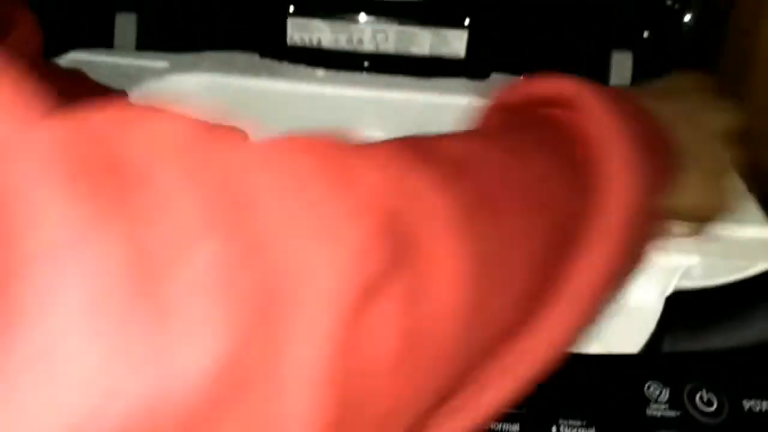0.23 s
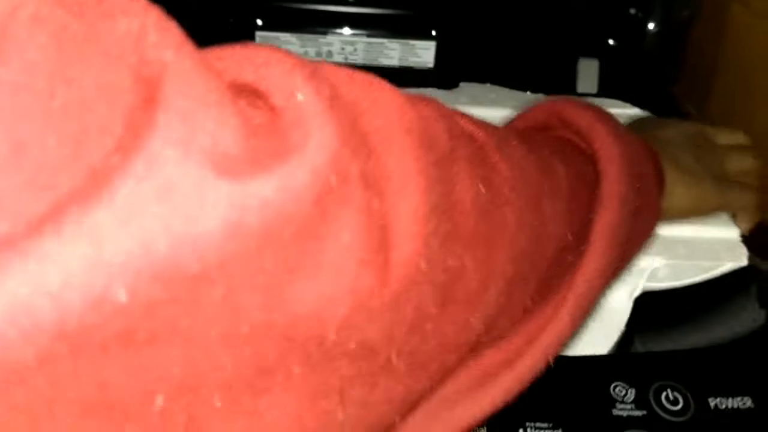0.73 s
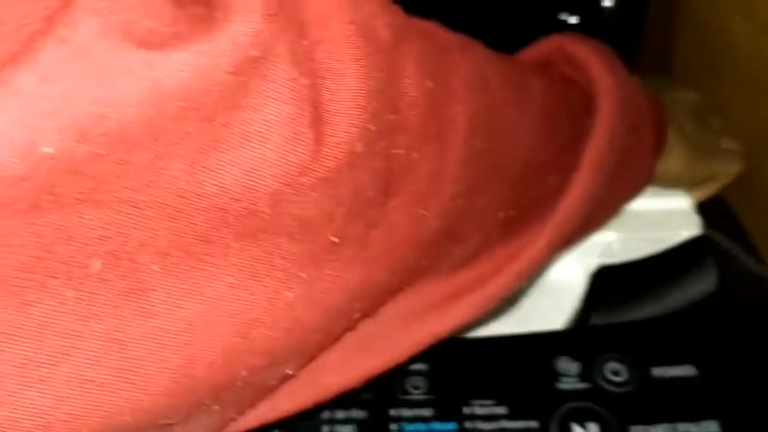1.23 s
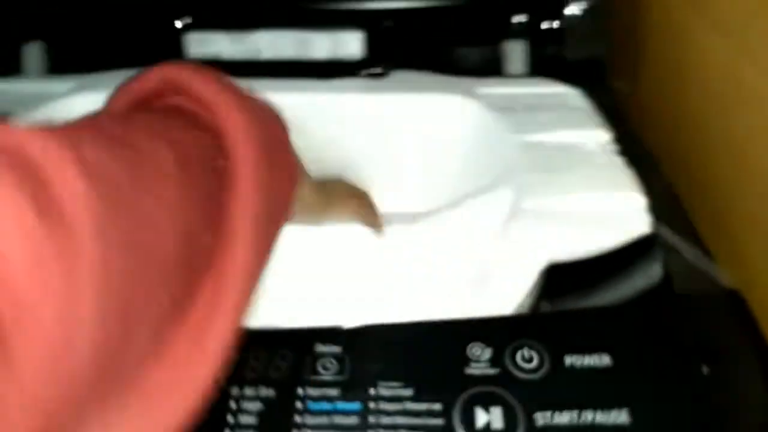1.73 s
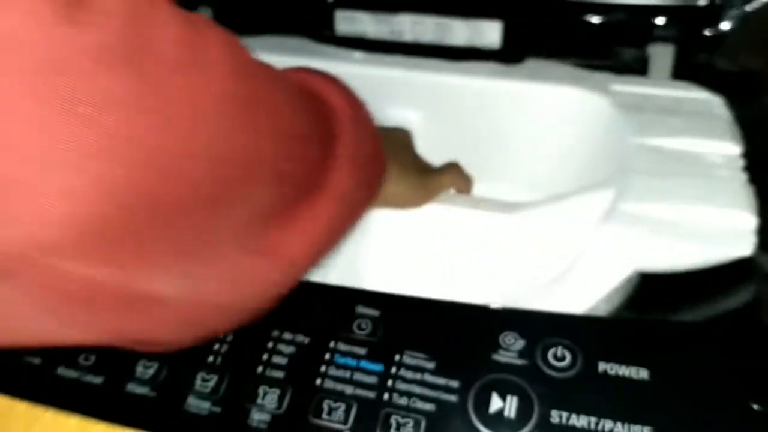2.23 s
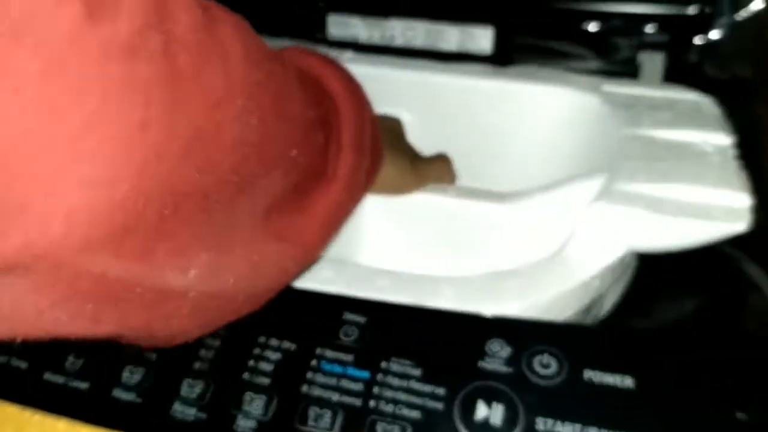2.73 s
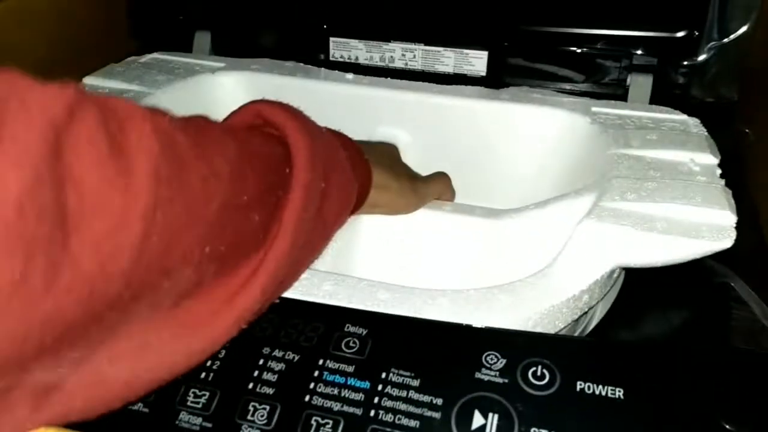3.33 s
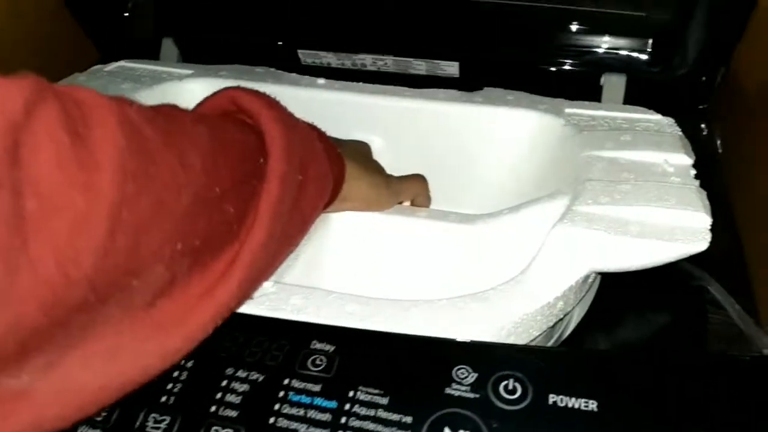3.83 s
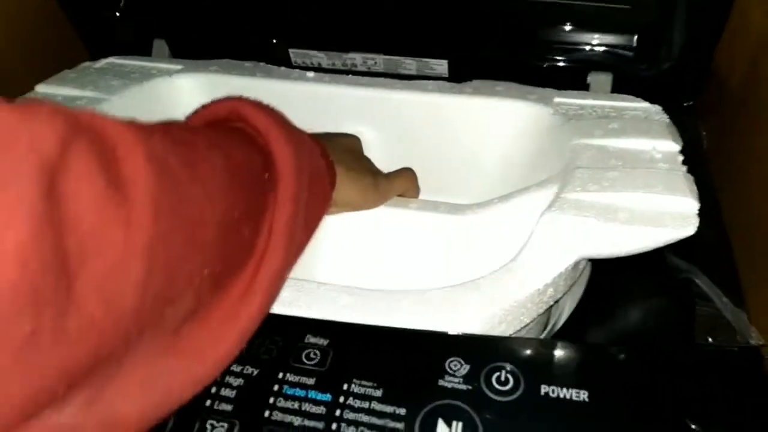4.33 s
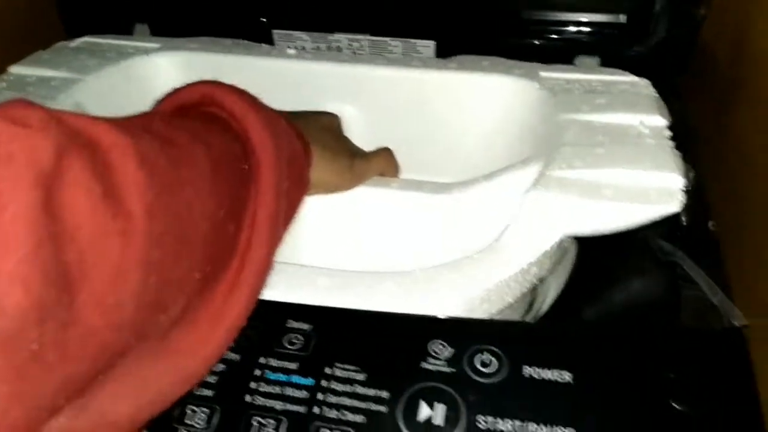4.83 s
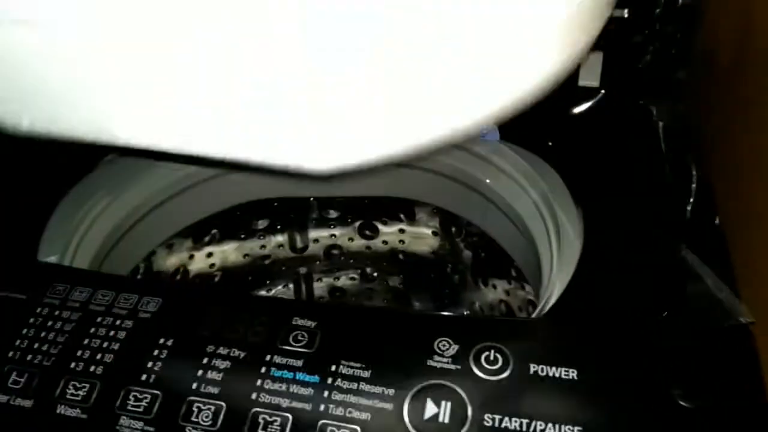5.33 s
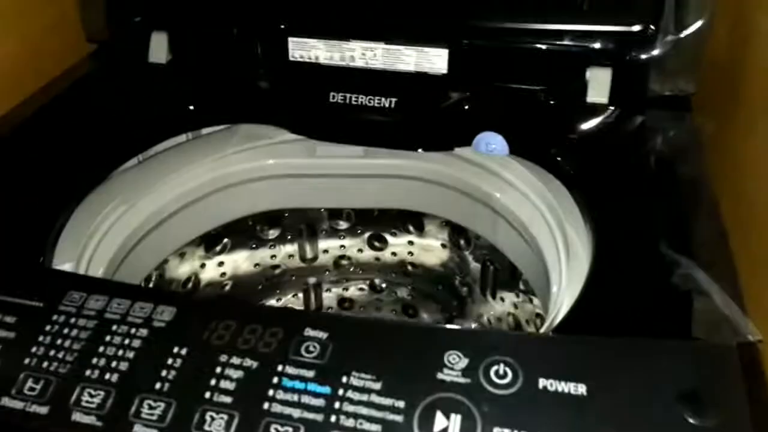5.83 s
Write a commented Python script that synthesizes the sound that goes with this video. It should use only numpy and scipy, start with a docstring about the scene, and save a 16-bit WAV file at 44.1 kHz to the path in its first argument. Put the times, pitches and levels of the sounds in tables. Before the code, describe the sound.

Close, irregular hissing rubs, sharp cracks and brief squeaks of tight foam packing being worked loose from a washing machine's plastic opening.

```python
"""Polystyrene hisses, snaps and thuds close by: a hand works a tight block out of a washing machine.
Foam beads rub over the plastic mouth, edges snap free and tick along the rim, knuckles knock the foam.
The block creaks and a small patch squeaks as they stick and slip; the steel tub booms with each tug.
The open machine adds a short tail, over still air with a faint tone."""
import sys
import numpy as np
from scipy import signal
from scipy.io import wavfile
from scipy.ndimage import uniform_filter1d

SR = 44100
rng = np.random.default_rng(int(sys.argv[2]) if len(sys.argv) > 2 else 0)


def master(y):
    """Save y as 16-bit WAV."""
    cut = np.clip(np.atleast_2d(y).T, -1, 1)
    pcm = np.round(cut * 32767)  # scale
    wavfile.write(sys.argv[1], SR, pcm.astype(np.int16))


N = 267951


def gain_of(db):
    return 10 ** (np.asarray(db) / 20)


def unit_rms(x):
    return x / np.sqrt(np.mean(x ** 2) + 1e-20)


def unit_energy(taps):
    return taps / np.linalg.norm(taps)


def add(mix, start_s, sound):
    part = mix[round(start_s * SR):][:len(sound)]
    part += sound[:len(part)]


def through(x, taps):
    return signal.oaconvolve(x, taps)[:len(x)]


def colour(spectrum):
    """Minimum-phase taps for rows of freq_hz, level_db."""
    freq_hz, level_db = np.transpose(spectrum)
    bin_hz = abs(np.fft.fftfreq(4096, 1 / SR))
    bin_db = np.interp(np.log(bin_hz + 1), np.log(freq_hz), level_db)
    log_gain = np.log(gain_of(np.maximum(bin_db, -100)))
    response = np.exp(np.conj(signal.hilbert(log_gain)))
    return unit_energy(np.fft.ifft(response).real[:2048])


def modes(table):
    """A body's ringing after one click, for rows of pitch_hz, width_hz, level_db."""
    t = np.arange(SR // 2) / SR
    ring = sum(gain_of(db) * width_hz * np.exp(-np.pi * width_hz * t) * np.sin(2 * np.pi * hz * t)
               for hz, width_hz, db in table)
    return unit_energy(ring)


def slides(ramp_db=30):
    """Gains of hiss, grit, pressure and tub push: each slide rises, holds and fades; powers add."""
    # slides of the block: full_at_s, hold_s, rise_s, fade_s, hiss_db, grit_re_hiss_db,
    # pressure_re_hiss_db, push_db
    strokes = [ (0, 0.026, 0.012, 0.087, -37, -11.5, -19, -73),
               (0.071, 0.032, 0.14, 0.072, -27.5, -27.5, -36, -88),
               (0.118, 0.092, 0.063, 0.045, -46.5, -16, -26.5, -73),
               (0.284, 0.018, 0.069, 0.053, -41, -13, -10, -80),
               (0.313, 0.021, 0.046, 0.056, -33, -7.5, -17, -88.5),
               (0.391, 0.051, 0.091, 0.087, -68, -12, -2, -78.5),
               (0.541, 0.0088, .01, 0.071, -69, -21, -15, -75),
               (0.626, 0.051, 0.014, 0.27, -47.5, -29, -35, -69),
               (0.749, 0.1, 0.16, 0.11, -49, -24.5, -23.5, -67),
               (0.895, 0.069, 0.0084, 0.14, -49.5, -35.5, -32, -66.5),
               (0.997, 0.0077, 0.021, 0.038, -32.5, -15.5, -18, -48),
               (1.035, 0.014, 0.0097, 0.11, -30, -10.5, -17, -43),
               (1.294, 0.22, 0.13, 0.054, -51, -33, -27, -71),
               (1.368, 0.028, 0.014, 0.081, -41.5, -7, -9.5, -83),
               (1.483, 0.15, 0.14, 0.13, -44, -25.5, -37, -76.5),
               (1.601, 0.0077, 0.08, 0.022, -26.5, -26.5, -36, -82),
               (1.668, 0.032, 0.064, 0.17, -46.5, -23.5, -32, -70.5),
               (1.826, 0.057, 0.022, 0.15, -30.5, -23, -31.5, -52),
               (1.93, 0.025, 0.072, 0.097, -26.5, -19.5, -29.5, -46.5),
               (2.081, 0.021, 0.06, 0.12, -33, -22, -36, -51.5),
               (2.096, 0.07, 0.0077, 0.21, -37.5, -8, -10.5, -85.5),
               (2.216, 0.024, 0.051, 0.12, -36.5, 2.5, -2, -71),
               (2.273, 0.054, 0.15, 0.15, -24.5, -62, -26, -48.5),
               (2.447, 0.089, 0.068, 0.088, -34, -53, -44, -57),
               (2.52, 0.058, 0.049, 0.12, -47, -1.5, -3.5, -72),
               (2.581, 0.024, 0.037, 0.19, -34, -29, -29, -53.5),
               (2.731, 0.091, 0.087, 0.14, -37.5, -31.5, -36, -68),
               (2.795, 0.085, 0.033, 0.091, -44.5, -6, -1, -47),
               (3.031, 0.025, 0.016, 0.08, -49, -2, 9, -62), (3.113, 0.12, 0.064, .1, -63.5, -24, -5, -76),
               (3.205, 0.021, 0.018, 0.098, -42, -17.5, -19.5, -84),
               (3.28, 0.056, 0.035, 0.15, -68.5, -4, -3, -80),
               (3.364, 0.078, 0.027, .05, -62, -8.5, -20, -72),
               (3.468, 0.0095, 0.0096, 0.051, -50.5, 1, -9, -71),
               (3.507, 0.012, .02, 0.04, -60, -22, 2.5, -71),
               (3.567, 0.02, 0.0098, 0.088, -39, -8.5, -4.5, -49),
               (3.623, 0.043, 0.059, 0.097, -26.5, -18.5, -21.5, -42),
               (3.76, 0.08, 0.02, 0.14, -38, -21.5, -22.5, -56),
               (4.026, 0.041, 0.027, 0.11, -43, -7.5, -5, -89.5),
               (4.123, 0.032, 0.07, 0.11, -22.5, -7.5, -18, -92.5),
               (4.259, 0.067, 0.055, 0.054, -48, -28, -25.5, -72),
               (4.413, 0.032, 0.014, .02, -74.5, -21, 4, -81),
               (4.463, 0.095, 0.014, 0.037, -28, -3, 0.5, -66),
               (4.647, .12, 0.029, 0.057, -27.5, -2, -5, -53.5),
               (4.784, 0.057, 0.048, 0.015, -44.5, -2.5, 5.5, -37.5),
               (4.842, 0.1, 0.018, 0.13, -60, 2.5, 10.5, -34),
               (5.001, 0.025, 0.11, 0.084, -43.5, -10.5, -7.5, -56),
               (5.05, 0.24, 0.021, 0.084, -54.5, -29.5, -40, -60.5),
               (5.214, 0.023, 0.025, 0.085, -33.5, -9.5, -10.5, -34),
               (5.279, 0.016, 0.006, 0.031, -26, -25.5, -23, -54.5),
               (5.33, 0.052, 0.036, 0.21, -50, -18, -24, -54.5),
               (5.372, 0.018, 0.027, 0.12, -51.5, -5, -12, -61),
               (5.487, 0.039, 0.014, 0.044, -56.5, -15, -39, -71),
               (5.55, 0.059, 0.033, 0.11, -60.5, -38.5, -47, -70.5),
               (5.685, 0.011, 0.025, 0.018, -74, -32.5, -27, -68),
               (5.808, 0.033, .01, 0.029, -65, -34.5, -37.5, -86),
               (5.881, 0.073, 0.028, .03, -54.5, -22, -45, -94),
               (5.966, 0.099, .01, 0.045, -57, -10, -10.5, -101), ]
    t, power = np.arange(0, N, 32) / SR, 0
    for at_s, hold_s, rise_s, fade_s, hiss_db, grit_db, press_db, push_db in strokes:
        away = np.maximum((at_s - t) / rise_s, (t - at_s - hold_s) / fade_s).clip(0)
        levels_db = np.array([hiss_db, hiss_db + grit_db, hiss_db + press_db, push_db])
        power = power + gain_of(levels_db[:, None] - ramp_db * away) ** 2
    return [np.interp(np.arange(N) / SR, t, gain) for gain in np.sqrt(power)]


def beads(rate_hz, spread_db, judder_db, judder_s):
    """Beads catch: random clicks of uneven size, in clumps."""
    size = gain_of(spread_db * np.minimum(rng.exponential(1, N), 5))
    catches = rng.random(N) < rate_hz / SR
    span = int(judder_s * SR)
    clumps = unit_rms(uniform_filter1d(uniform_filter1d(rng.standard_normal(N), span), span))
    return unit_rms(size * catches * rng.standard_normal(N) * gain_of(judder_db * clumps))


def foam_hiss(x, hiss_gain, split_hz=11500, thin_below_db=-44):
    """Bright colour of foam on plastic; quiet hiss is thinner, mostly top treble."""
    # hiss spectrum, with the microphone's bright peak: freq_hz, level_db
    spectrum = [(1760, -52), (3000, -25.5), (4230, -18), (6480, -16), (10500, -8), (11400, -3), (13200, 0),
                (14900, -1), (16000, -27)]
    hiss = through(x, colour(spectrum))
    low = signal.sosfiltfilt(signal.butter(4, split_hz, fs=SR, output="sos"), hiss)
    fullness = np.minimum(hiss_gain / gain_of(thin_below_db), 1)
    return hiss - low + low * fullness ** 0.15


def cell_walls(x, share):
    """Part of the treble rings in the thin foam walls."""
    # wall modes: pitch_hz, width_hz, level_db
    wall_modes = [(9690, 51, 1), (10200, 110, 0.5), (10760, 170, 5.5), (11676, 110, -1.5),
                  (12640, 150, 0.5), (13900, 160, -12.5), (14600, 35, 4)]
    return np.sqrt(1 - share) * x + np.sqrt(share) * through(x, modes(wall_modes))


def rim(x, ribs_share=0.067):
    """Broad grit with the ribs ringing in it."""
    # grit spectrum: freq_hz, density_db
    grit_spectrum = [(530, -29), (900, 3), (1470, 2.5), (1850, 2), (3090, 1.5), (6060, -6), (9000, -18.5),
                     (11700, -26), (19800, -120)]
    # rib and rim modes: pitch_hz, width_hz, level_db
    rib_modes = [(1570, 240, 5.5), (2312, 320, 8), (3110, 260, 9), (3810, 140, 5.5), (4557, 200, 0),
                 (5260, 180, 2.5)]
    grit = through(x, colour(grit_spectrum))
    return np.sqrt(1 - ribs_share) * grit + np.sqrt(ribs_share) * through(x, modes(rib_modes))


def moving_contact(x, patchy_db=3.5):
    """The contact moves, so the colour shifts in patches of time and frequency."""
    spectra = signal.stft(x, nperseg=256, noverlap=192)[2]
    patches = rng.standard_normal(spectra.shape[::-1]).T
    patches = unit_rms(uniform_filter1d(uniform_filter1d(patches, 4, axis=0), 24, axis=1))
    return signal.istft(spectra * gain_of(patchy_db * patches - 3), nperseg=256, noverlap=192)[1][:len(x)]


def block(pressure, loose_s=3.95):
    """The block's low modes change once it is loose; slow pushes make no sound."""
    # block seated in the mouth: pitch_hz, width_hz, level_db
    seated_modes = [(193, 7.7, -19), (332.6, 49, 11.5), (415, 78, 6), (772, 250, 11), (1370, 78, 2.5)]
    # block loose: pitch_hz, width_hz, level_db
    loose_modes = [(195, 30, -22), (336, 17, 9), (492, 60, -2), (780, 120, 10), (918, 94, 3.5)]
    loose = np.arange(N) > loose_s * SR
    ring = through(pressure * ~loose, modes(seated_modes)) + through(pressure * loose, modes(loose_modes))
    return signal.sosfilt(signal.butter(2, 140, "highpass", fs=SR, output="sos"), ring)


def foam(hiss_gain, grit_gain, pressure_gain):
    """Rubbing, snaps and creaks drive hiss, rim and block."""
    slips, gate, regular = creaks()
    hiss = hiss_gain * gate * beads(13000, 0.35, 2.35, 0.0041)
    # regular slips displace random tearing and pressure
    grit = grit_gain * gate * gain_of(-17 * regular) * beads(6000, 1.1, 1.9, 0.012)
    pressure = pressure_gain * gain_of(-9.1 * regular) * beads(2500, 0.8, 2.0, 0.0072)
    cracks, snap_grit, blows = snaps()
    tear = gain_of(-60 * np.arange(SR // 8) / SR / 0.008)  # each slip tears beads for a few ms
    torn = through(abs(slips), unit_energy(tear)) * rng.standard_normal(N)
    rubbing = moving_contact(cell_walls(foam_hiss(hiss, hiss_gain), share=0.039) + rim(grit))
    crackling = foam_hiss(cracks + gain_of(-7) * torn, hiss_gain) + rim(snap_grit)
    creaking = gain_of(-15) * rim(torn) + gain_of(-7) * rim(slips, ribs_share=0.85)
    return rubbing + crackling + creaking + block(pressure + slips + blows)


def cavity(x, t60_s=0.06, delay_s=0.003):
    """Short tail of the open machine: sparse echoes of random sign."""
    grid = np.arange(0, SR // 3, 20)
    echoes = rng.choice([-1., 1.], len(grid)) * gain_of(-60 * grid / SR / t60_s)
    taps = np.zeros(SR // 2)
    taps[grid + rng.integers(0, 20, len(grid)) + int(delay_s * SR)] = echoes
    return through(x, unit_energy(taps))


def tub(push_gain):
    """Lumpy shoves and single bumps ring the steel tub and cabinet."""
    # tub modes: pitch_hz, width_hz, level_db
    tub_modes = [(68.5, 13, 0), (93, 20, -7), (125, 30, -11), (180, 60, -15)]
    # block bumps the tub: start_s, level_db
    bumps = [(0.969, -46), (1.412, -56.5), (2.323, -38), (2.828, -45), (3.034, -48), (3.598, -35.5),
             (3.825, -46), (4.79, -48), (5.218, -29.5), (5.28, -35.5)]
    push = push_gain * beads(1100, 0.66, 1.5, 0.05)
    for start_s, level_db in bumps:
        add(push, start_s, gain_of(level_db) * np.hanning(60))
    return through(push, modes(tub_modes))


def air(level_db=-83, tone_hz=1019, tone_width_hz=8):
    """Still air and a faint wavering tone."""
    # air spectrum: freq_hz, density_db
    spectrum = [(24, -27.5), (40, -4.5), (81, -3), (516, -11.5), (1040, -16), (4460, -28.5), (11300, -16),
                (16000, -25)]
    # tone envelope: time_s, level_db
    tone_levels = [(0, -62.5), (0.45, -85), (.75, -80.5), (1.501, -100), (2.8, -71), (3.1, -110)]
    time_s, tone_db = np.transpose(tone_levels)
    tone = through(rng.standard_normal(N), modes([(tone_hz, tone_width_hz, 0)]))
    still = gain_of(level_db) * through(rng.standard_normal(N), colour(spectrum))
    return still + gain_of(np.interp(np.arange(N) / SR, time_s, tone_db)) * tone


def snaps(tick_t60_s=0.0048, pop_t60_s=0.0035):
    """Edges snap free: a tick, then a tail. Returns cracks, grit for the rim, blows on the block."""
    # edge snaps: start_s, crack_db, grit_re_crack_db, blow_re_crack_db
    edges = [(0.2529, -36, 4.5, -10.5), (0.415, -32, -33, -59), (.527, -32.5, -41, -40),
             (0.685, -25.5, -39, -26), (0.708, -28, -37, -8.5), (0.8145, -16.5, -51, -43),
             (0.964, -36.5, -6, 2), (0.9948, -6, -24, -31), (1.0359, -15.5, -7.5, -8),
             (1.3668, -15, -6.5, -13), (1.599, -11.5, -36.5, -50), (1.822, -25, -32, -8),
             (1.9223, -26, -2.5, 1), (2.038, -24.5, -50, -44), (2.0982, -14, -5, -43),
             (2.509, -15.5, -15, -29), (2.514, -18.5, -8.5, -41), (2.523, -24, -3.5, -30),
             (2.5294, -21, -13, -21), (2.5446, -14, -9.5, -34), (2.557, -21.5, -3, -36),
             (2.581, -15.5, -35, -10), (2.691, -31, -28, -40), (2.797, -37.5, -5, 16),
             (2.83, -19, -25, -34), (2.837, -14.5, -7.5, -33), (2.845, -16, -3, -20),
             (2.957, -41, -33, -38), (3.035, -25.5, -31, 12.5), (3.257, -27.5, -42, -44),
             (3.303, -36, -35, -40), (3.3648, -36.5, -0.5, -28), (3.436, -52, -17, 18.5),
             (3.466, -25.5, -5.5, -40), (3.564, -21, -10, -27), (3.591, -15.5, -35, -34),
             (3.7906, -16, -21.5, -47), (3.815, -23, -37, -27), (3.914, -26, -10.5, -12.5),
             (3.977, -39, -30, -46), (4.0062, -14, -22, -36), (4.0274, -4.5, -11.5, -45),
             (4.0523, -12.5, -6, -42), (4.0707, -9.5, -9.5, -34), (4.193, -18.5, -9.5, -28),
             (4.207, -14.5, -9, 3), (4.223, -14.5, -27, -39), (4.239, -14, -10, -31),
             (4.269, -21, -13.5, -8.5), (4.435, -35.5, -9, 5), (4.445, -32.5, -9.5, 13),
             (4.622, -17.5, -10.5, 5), (4.636, -20, -14.5, 10), (4.7923, -28, -6, 18),
             (4.808, -29, 0, 18.5), (4.8243, -17, -7, 11), (4.835, -19.5, -3.5, -2),
             (4.8679, -20, -4.5, 13), (4.8947, -19, -3.5, 16), (4.9222, -16.5, -3.5, 8),
             (4.9413, -15, -5, 8), (5.1925, -13, -36, -34), (5.2, -9, -22, -45), (5.279, -19.5, -15, 1.5),
             (5.712, -55, -10.5, -10.5), (5.9716, -31, -2, -1), (6.0493, -31, -3.5, -1)]
    # dry pops as the block tears loose: start_s, level_db
    pops = [(4.0538, -4), (5.1928, 1), (5.1998, 3)]
    t = np.arange(SR // 8) / SR
    jolt = 0.22 * np.exp(-t / 0.0001)  # the block jumps as the edge lets go
    bursts = rng.standard_normal((128, len(t))) * (1 - np.exp(-t / 0.0005))
    cracks, grit, blows = np.zeros((3, N))
    for (start_s, crack_db, grit_db, blow_db), burst in zip(edges + rattles(), bursts):
        shake = min(gain_of(max(blow_db, grit_db)), 1)  # more shake: softer tick, longer tail
        tail_t60_s = 0.023 + 0.0094 * shake
        tick = gain_of(crack_db - 8 - 14.4 * np.sqrt(shake) - 60 * t / tick_t60_s) * burst
        tail = gain_of(crack_db - 10 - 60 * t / tail_t60_s) * burst
        add(cracks, start_s, tick + tail)
        add(grit, start_s, gain_of(grit_db) * (tick + tail))
        add(blows, start_s, gain_of(crack_db + blow_db) * jolt + gain_of(blow_db - 9) * tail)
    for (start_s, level_db), burst in zip(pops, bursts[::-1]):
        add(cracks, start_s, gain_of(level_db - 60 * t / pop_t60_s) * burst)
    return cracks, grit, blows


def knocks(attack_s=0.0059):
    """Knuckles thud on hollow foam: close modes, the higher ones dying sooner."""
    # knuckle hits: start_s, level_db, t60_at_450_hz_s
    hits = [(0.2552, -6.5, 0.044), (0.287, -23.5, 0.071), (0.316, -20.5, 0.041), (0.335, -35, 0.1),
            (1.365, -41.5, 0.14), (3.062, -44, 0.15)]
    # modes of the hollow: pitch_hz, level_db
    hollow_modes = [(300, -28), (365, -21), (420, 0.5), (490, 0.5), (570, -2), (680, -10.5), (880, -13.5),
                    (1150, -19)]
    t, out = np.arange(SR // 4) / SR, np.zeros(N)
    for start_s, level_db, t60_s in hits:
        ring = sum(gain_of(db - 60 * t / t60_s * (hz / 450) ** 0.43) * np.sin(2 * np.pi * hz * t)
                   for hz, db in hollow_modes)
        add(out, start_s, gain_of(level_db) * ring * (1 - np.exp(-t / attack_s)))
    return out


def rattles(fade_db=-10.5, grit_db=-56, blow_db=-27):
    """An edge ticks along the rim as a slide dies, slower and fainter. Returns rows of small snaps."""
    # runs of ticks: start_s, length_s, first_rate_hz, first_level_db
    runs = [(0.398, 0.06, 125, -34), (2.87, 0.057, 114, -30), (3.0227, 0.13, 90, -28.5),
            (4.32, 0.055, 130, -59), (4.996, 0.032, 95, -36), (5.894, 0.093, 81, -52),
            (5.489, 0.035, 140, -41)]
    rows = []
    for start_s, length_s, rate_hz, level_db in runs:
        progress = np.arange(0, 1, 1 / (length_s * SR))
        cycles = np.cumsum(rate_hz * (1 - progress ** 4)) / SR
        for k in np.flatnonzero(np.diff(np.ceil(cycles), prepend=0)):
            rows.append((start_s + k / SR, level_db + fade_db * progress[k], grit_db, blow_db))
    return rows


def scrapes():
    """Short scrapes: narrow midrange rings or broad bursts of bright hiss; quick start, slower end."""
    # scrapes: start_s, length_s, centre_hz, width_hz, level_db
    contacts = [(0.486, 0.066, 1450, 50, -81), (1.034, 0.046, 1340, 180, -41.5),
                (3.201, 0.062, 13700, 4000, -42), (3.36, 0.033, 2200, 800, -53.5),
                (5.278, 0.034, 13000, 4500, -23.5)]
    out = np.zeros(N)
    for start_s, length_s, centre_hz, width_hz, level_db in contacts:
        progress = np.minimum(np.arange(SR // 5) / SR / length_s, 1)
        envelope = np.minimum(10 * progress, 1) * np.cos(np.pi / 2 * progress)
        friction = rng.standard_normal(len(progress)) * envelope
        band = modes([(centre_hz, width_hz, 0)])
        steep_band = unit_energy(through(band, band))
        add(out, start_s, gain_of(level_db) * through(friction, steep_band))
    return out


def creaks():
    """The whole block sticks and slips. Returns a click per slip, a hiss gate, a 0-1 creaking mask."""
    # one path per creak: time_s, slip_rate_hz, level_db, unevenness (0-1)
    paths = [
        [(2.199, 168, -56, 0.01), (2.225, 247, -42, 0.17), (2.265, 390, -42.5, 0.05)],
        [(4.105, 990, -33, 0.01), (4.11, 840, -31.5, 0.11), (4.122, 513, -30, 0.07), (4.148, 365, -32, 0.04),
         (4.163, 210, -30.5, 0.1), (4.18, 117, -39.5, 0.01), (4.199, 107, -36, 0.1)],
        [(4.457, 187, -33, 0.13), (4.5, 194, -31.5, 0.13), (4.575, 175, -33.5, 0.1)],
        [(4.644, 406, -31.5, 0.09), (4.678, 425, -27.5, 0.14), (4.7, 460, -31, 0.19), (4.728, 476, -29.5, 0.01),
         (4.762, 513, -29.5, 0.08), (4.778, 420, -32, 0.08)],
    ]
    slips, gate, regular = np.zeros(N), np.ones(N), np.zeros(N)
    for path in paths:
        time_s, *columns = np.transpose(path)
        t = np.arange(time_s[0], time_s[-1], 1 / SR)
        rate_hz, level_db, uneven = (np.interp(t, time_s, column) for column in columns)
        rate_noise, size_noise = rng.standard_normal((2, SR // 4))[:, :len(t)]
        wander = unit_rms(uniform_filter1d(rate_noise, 120))
        cycles = np.cumsum(rate_hz * (1 + 0.5 * uneven * wander)) / SR
        clicks = np.diff(np.floor(cycles), prepend=0) > 0
        size = (1 + 1.6 * uneven * size_noise) * signal.windows.tukey(len(t), 0.1)
        puffs = unit_rms(np.exp(-(cycles % 1) / 0.55)) - 1  # beads hiss hardest during a slip
        add(slips, t[0], clicks * size * gain_of(level_db) * np.sqrt(SR / rate_hz))
        add(gate, t[0], 0.88 * puffs)
        add(regular, t[0], signal.windows.tukey(len(t), 0.2))
    return slips, gate, regular


def squeaks():
    """A small patch slips fast: wavering, fluttering tones with overtones."""
    # one path per squeak: time_s, pitch_hz, level_db
    paths = [
        [(2.256, 3870, -42), (2.268, 5020, -41), (2.278, 5500, -48), (2.285, 6460, -40), (2.3, 6700, -55)],
        [(2.288, 7660, -55), (2.297, 9600, -46.5), (2.305, 10100, -56), (2.318, 8900, -45.5),
         (2.325, 7900, -38), (2.332, 7650, -56)],
        [(2.326, 7350, -50), (2.34, 5900, -42), (2.35, 6900, -42), (2.356, 8820, -35), (2.36, 9530, -37),
         (2.374, 9640, -40), (2.38, 10680, -41.5), (2.388, 10690, -47), (2.395, 9680, -38),
         (2.415, 8740, -36.5), (2.432, 7770, -46), (2.47, 7070, -57)],
        [(2.575, 3710, -60), (2.6, 3970, -34), (2.635, 3935, -35), (2.655, 4330, -52)],
    ]
    # partials per squeak: first_db, second_db, third_db
    timbres = [
        [0, 3, -5],
        [5, -18, -40],
        [1, 7, -26],
        [-20, -9, 4],
    ]
    # pitch waver per squeak: rms_fraction
    waver_depths = [.02, .02, .016, .005]
    out = np.zeros(N)
    for path, partials_db, depth in zip(paths, timbres, waver_depths):
        time_s, path_hz, path_db = np.transpose(path)
        t = np.arange(time_s[0], time_s[-1], 1 / SR)
        waver = unit_rms(uniform_filter1d(rng.standard_normal(len(t)), 50))
        flutter = unit_rms(uniform_filter1d(rng.standard_normal(len(t)), 160))
        pitch_hz = np.interp(t, time_s, path_hz) * (1 + depth * waver)
        phase = 2 * np.pi * np.cumsum(pitch_hz) / SR
        tone = sum(gain_of(db) * np.sin(k * phase) * (k * pitch_hz < SR / 2)
                   for k, db in enumerate(partials_db, 1))
        level_db = np.interp(t, time_s, path_db) + 6.5 * (np.minimum(flutter, 1) - 0.5)
        add(out, t[0], np.sqrt(2) * tone * gain_of(level_db) * signal.windows.tukey(len(t), 0.2))
    return cell_walls(out, share=0.6)


def scene():
    """Foam in the machine's mouth, its short tail, the tub and still air; mono."""
    hiss_gain, grit_gain, pressure_gain, push_gain = slides()
    near = foam(hiss_gain, grit_gain, pressure_gain) + squeaks() + scrapes() + knocks()
    return (near + gain_of(-10) * cavity(near) + tub(push_gain) + air())[None]


def record(dry):
    """The deepest bass is cut, the top treble steps down, then the band ends."""
    bass_hz, shelf_hz, shelf_db, edge_hz = 60, 15650, -18, 16800
    dry = signal.sosfilt(signal.butter(4, bass_hz, "highpass", fs=SR, output="sos"), dry)
    rounded = 0.6 * np.tanh(dry / 0.6)  # the microphone rounds off the sharpest cracks
    shelf, edge = (signal.firwin(511, hz, window=("kaiser", 9), fs=SR) for hz in (shelf_hz, edge_hz))
    low = signal.oaconvolve(rounded, shelf[None], "same")
    stepped = low + gain_of(shelf_db) * (rounded - low)
    return signal.oaconvolve(stepped, edge[None], "same")


dry = scene()
out = record(dry)
master(out)
```